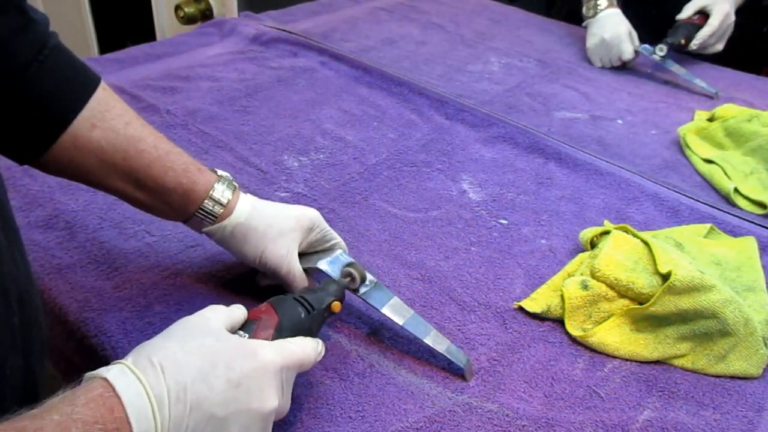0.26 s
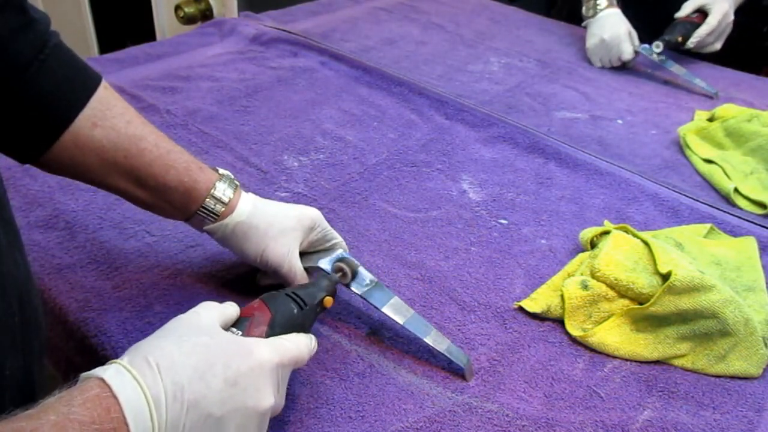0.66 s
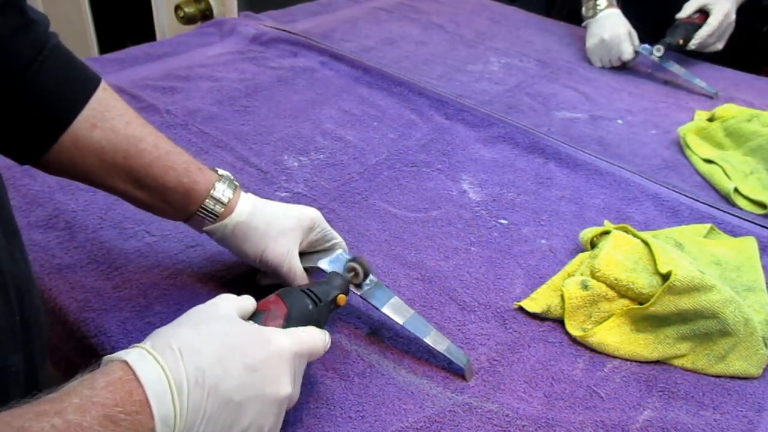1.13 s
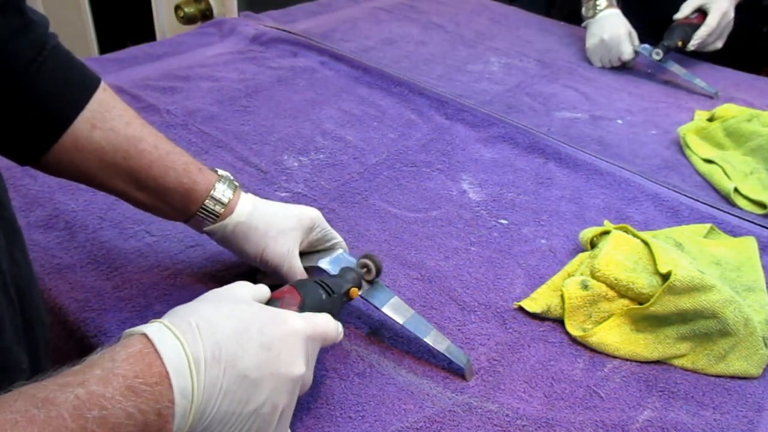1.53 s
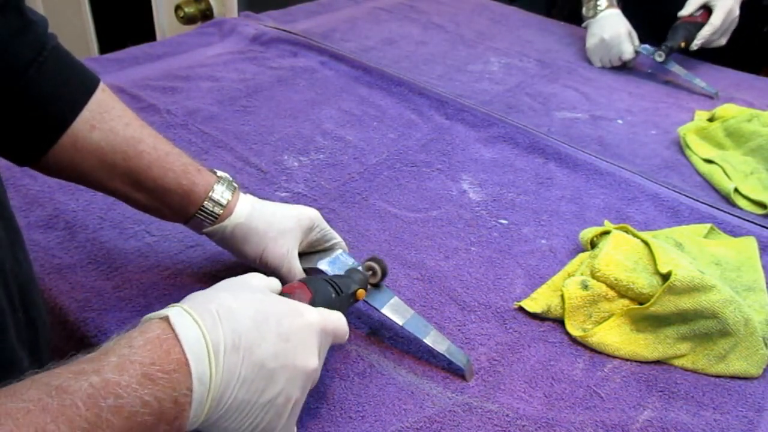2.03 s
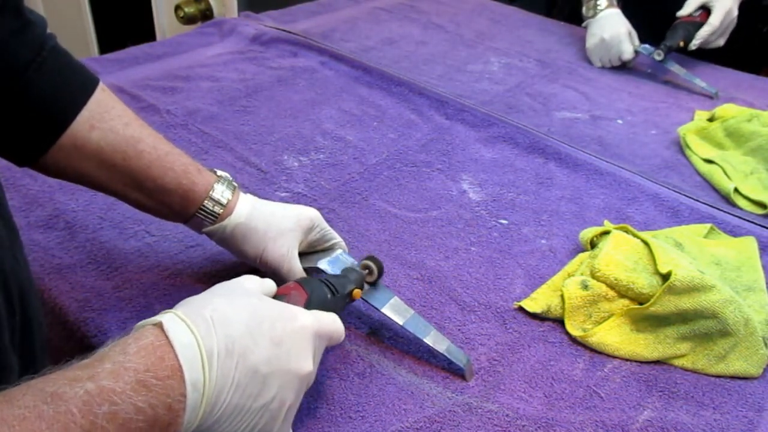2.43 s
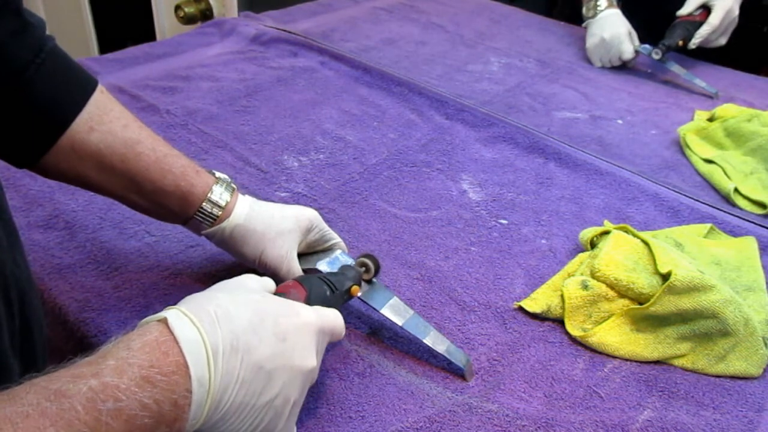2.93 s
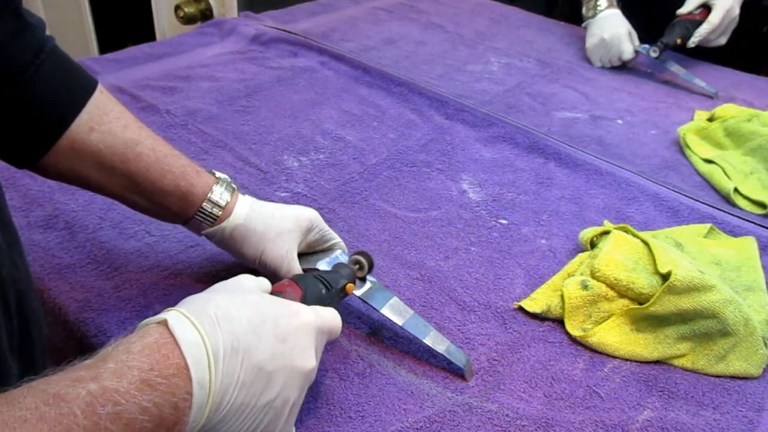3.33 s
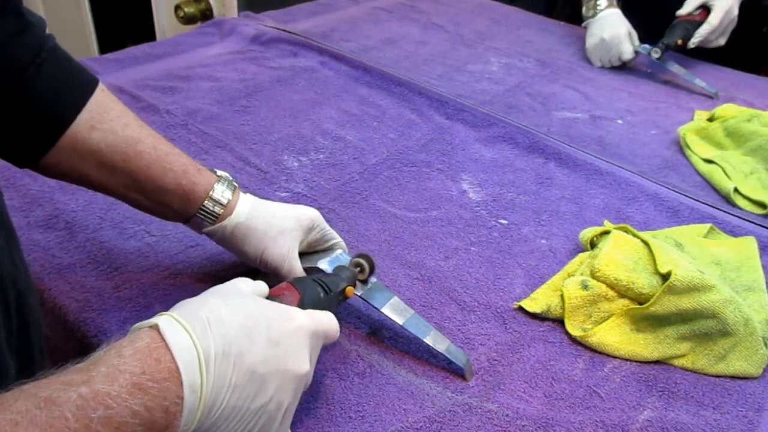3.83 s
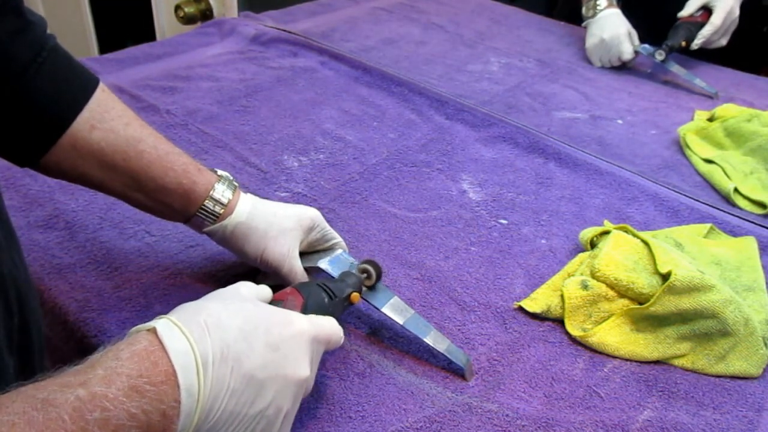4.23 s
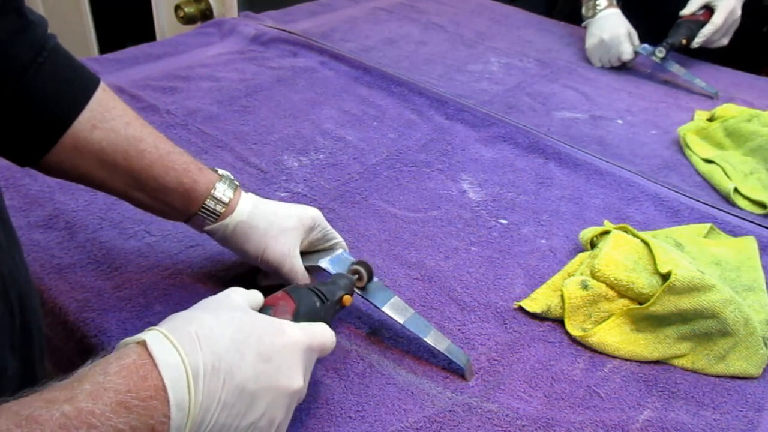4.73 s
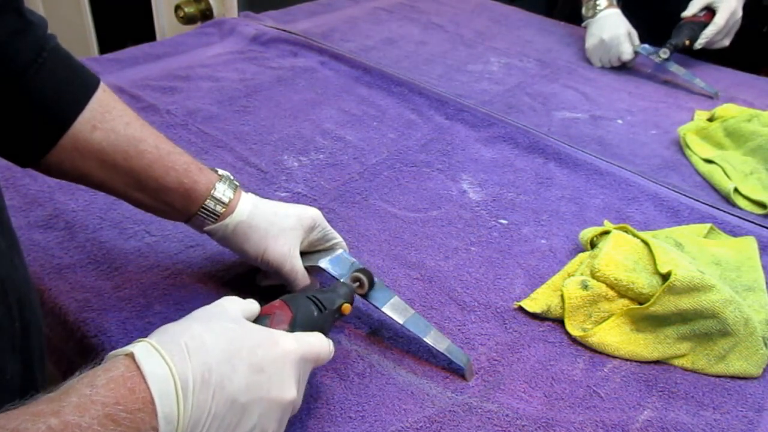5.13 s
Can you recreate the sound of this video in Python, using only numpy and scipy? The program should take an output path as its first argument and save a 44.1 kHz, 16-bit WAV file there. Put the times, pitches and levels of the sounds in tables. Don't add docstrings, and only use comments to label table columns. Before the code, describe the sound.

From the start a small rotary tool is already running, close and centered, with a buzzing, nasal whine made of many stacked tones and a fairly soft buffing hiss. Over the first second the pitch sinks slightly; from about 1 second the whine becomes stronger and the scrape brighter. Repeated strokes, several a second, make the pitch dip and recover. Near 1.7 to 1.9 seconds the wheel skips, with two short dull metallic knocks, a brief wavering of level and soft bench thumps. The motor eases around 2 seconds, then swells by 2.6 with another low thump. From 3 to 5 seconds it is loud and dense, straining more deeply under each stroke, with fleeting high metallic whistles and the lowest pitch after 4.6. Around 5.25 the wheel lifts briefly; pitch rises and some upper tones fade as it ends still running. Faint room rumble and mains hum remain beneath.

```python
import sys
import numpy as np
from scipy import signal
from scipy.fft import rfft, irfft, next_fast_len
from scipy.io import wavfile
from scipy.ndimage import uniform_filter1d

SR = 44100
rng = np.random.default_rng(int(sys.argv[2]) if len(sys.argv) > 2 else 0)


def voltage_ratio(level):
    return 10 ** (np.asarray(level, float) / 20)


def store_wav(level_fs):
    pcm = np.round(np.clip(np.atleast_2d(level_fs), -1, 1) * 32767)
    wavfile.write(sys.argv[1], SR, pcm.T.astype(np.int16))


N = 236623
CONTROL_STEP = 64
RIPPLE_HZ = 120
STROKE_S = 0.07
LEAVE_S, LEAVE_HALF_S, LEAVE_DB = 5.34, 0.065, -11
LIFT_HIGH = 2.1
WHEEL_REF_DB = -24.5

# frequency_hz, density_db
ROOM = [(20, -14), (40, 2), (70, -4), (150, -3), (250, 0.5), (400, -2.5), (700, -30)]
# frequency_hz, level_db
HUM = [(72, -66.5), (120, -61), (240, -63.5)]
# start_s, peak_db, pitch_hz, t60_s
THUMPS = [(.02, -52, 48, .6), (.77, -51, 46.7, 1.4), (1.44, -58, 68, 0.39), (1.71, -44, 55, 0.44),
          (1.87, -43, 51.5, 0.86), (2.13, -41, 49.76, 0.64), (2.66, -38.5, 50, 0.58),
          (3.22, -62, 46.89, 0.49), (3.41, -44, 50, 0.94), (4.05, -47, 48.25, 0.52)]
# start_s, peak_db, pitch_hz, t60_s
SKIPS = [
    (1.715, -30.5, 290, 0.22),
    (1.72, -35, 230, 0.1),
    (1.87, -28.5, 252, 0.1),
    (1.875, -38, 324, 0.12),
]
# frequency_hz, width_hz, level_db
STRIP = [(1887, 87, -33.5), (2880, 260, -34)]
# centre_s, multiple, level_db, half_length_s
GLINTS = [(.05, 36, -55, .08), (.33, 36, -44, 0.12), (.39, 60, -49, .035), (2.2, 60, -49, .15),
          (2.62, 38, -46, .2), (3.27, 62, -39, 0.041), (3.411, 62, -47, .04), (3.506, 38, -36, .06),
          (3.66, 38, -35, 0.091), (4.25, 64, -45, 0.17), (4.55, 64, -56, 0.057), (4.62, 66, -43, .08),
          (4.691, 64, -41, 0.043), (4.68, 40, -37, 0.071), (4.982, 40, -40.5, 0.097), (5.2, 68, -67, 0.048)]
# time_s, level_db
HISS = [(0.0, -32.5), (1.61, -26), (1.93, -25.5), (1.96, -24.5), (2.11, -24), (2.72, -22), (3.23, -24),
        (4.0, -22.5), (5.19, -23), (5.24, -23.5), (5.37, -24)]
# frequency_hz, density_db
WHEEL = [(200, -45), (330, -15.5), (520, -14.5), (700, -5.5), (900, -7), (1400, -4), (2000, -2.5),
         (2900, -4), (3600, -5.5), (4500, -4), (6000, -7.5), (8000, -11), (10300, -14.5), (11500, -30),
         (15000, -44)]
# frequency_hz, density_db
FAN = [(8000, -31), (10500, -3.5), (12000, -4.5), (13500, -8), (15000, -11), (16000, -60)]
# time_s, turns_hz
SPEED = [(0.0, 216.8), (0.38, 211.4), (0.46, 209.3), (0.92, 206.7), (1.06, 202.5), (1.72, 205.9),
         (1.78, 211), (1.87, 208), (1.95, 214), (2.06, 214.1), (2.61, 208), (3.18, 207.1), (3.46, 204.3),
         (4.26, 202.4), (4.66, 192.5), (5.215, 193.5), (5.28, 200.2), (5.37, 206.6)]
# centre_s, loss_hz
STROKES = [(0.29, 0.99), (0.499, 1.91), (0.84, 1.5), (1.04, 1.5), (1.3, 2.3), (1.46, 2.6), (1.61, 2.87),
           (1.74, 2.53), (2.09, 2.98), (2.25, 1.36), (2.52, 1.9), (2.659, 2.12), (2.81, 2.12), (2.97, 2.25),
           (3.14, 3.66), (3.33, 3.73), (3.5, 5.66), (3.671, 4.3), (3.87, 5.5), (4.031, 5.7), (4.179, 5.5),
           (4.34, 6.6), (4.519, 4.84), (4.68, 3.6), (4.85, 5.26), (5.02, 4.65), (5.18, 6.3)]
# time_s, motor_level_db, tilt (0-1), load (0-1)
HOLD = [(0.0, -31, 1, 0.6), (0.3, -28, 0.9, 0.8), (0.53, -26.5, 0.56, 1), (0.73, -28, 0.86, 0.88),
        (1.04, -22, 0.64, 0.85), (1.47, -20.5, 0.63, 0.7), (1.7, -20.5, 0.67, 0.82),
        (1.79, -20.5, 0.35, 0.66), (2.05, -24.5, 0.78, 0.1), (2.45, -20, 0.8, 0.1), (2.59, -17, 0.75, 0.61),
        (2.93, -16.5, 0.73, 0.73), (3.33, -18, 0.58, 0.78), (3.83, -16.5, 0.56, 0.79),
        (4.25, -16.5, 0.48, 0.68), (4.67, -17.5, 0.23, 0.8), (5.07, -18, 0.24, 0.8),
        (5.37, -20, 0.03, 0.58)]
# centre_s, level_db, half_width_s
LIFTS = [
    (1.755, -1.5, 0.023),
    (1.915, -1, 0.027),
    (1.97, 1.6, 0.026),
    (5.245, -2, 0.023),
]

# multiple, level_db (over the motor), tilt_db, load_db, braking_db_per_hz
PULL = [(2.0, -3, -1.8, -13, 0.29), (4.0, -14, 9.5, -3, 0.35), (6.0, -9.5, -0.5, -5.5, 0.0),
        (8.0, -14, 6, 4.5, 0.82)]
CASING = [(10.0, -1.5, -6.5, -10.5, 0.57), (12.0, -19.5, 7, 9.5, -0.0), (14.0, -13, -11.5, 12.5, 0.64),
          (16.0, 1, -5.5, -10.5, 0.69)]
BRUSHES = [(20.0, -13, 0.5, -2, 0.14), (22.0, -19, -1.5, 4.5, 0.35), (24.0, -19, 8, -3.5, 0.68),
           (30.0, -7, -9.5, -6, 0.025)]
BLADES = [(32.0, -20, -5, 7.5, -0.25), (48.0, -19.5, -11.5, 3.5, 0.13), (62.0, -38, 2.1, -1, 0.4),
          (64.0, -32, -12.6, 4.1, 0.3)]
IMBALANCE = [(1.0, -54, 15.8, 17.5, 0.23), (3.0, -36, 13.4, 9.5, 0.21), (9.0, -36.5, 35, -5, -0.2)]
# ripple_steps, level_db, tilt_db, load_db, braking_db_per_hz
SIDE_TONES = [(-2.0, -7.5, -5.5, -11, 0.5), (-1.0, -15.5, -20, 11.5, -0.8), (1.0, -22.5, -10, 7.5, 0.5)]
# multiple, early_db, middle_db, late_db
MINOR = [(7.01, -43.5, -37.5, -38.5), (11, -43, -62, -60), (13.02, -44, -31, -45), (14.95, -59, -50, -50),
         (17.07, -57, -38, -43), (17.92, -47, -39, -34), (25.93, -55, -35.5, -48),
         (27.97, -44.5, -35.5, -45), (34.2, -48.5, -37.5, -36), (35.9, -55, -41.5, -47),
         (38, -64, -52, -60), (40, -53, -61, -55), (44, -57, -50, -53), (46, -50, -54, -44),
         (50, -60, -71, -59), (52, -57, -66, -56), (56, -63, -57, -55), (60, -62, -58, -58),
         (66, -66, -58, -60)]
# multiple, ripple_steps, early_db, middle_db, late_db
FAINT_SIDES = [(2, 1, -70, -67, -55), (4, -1, -58, -87, -79), (12, 1, -52, -56, -39),
               (14, 1, -75, -33, -42)]
STAGES = [.85, 2.75, 4.5]

# centre_s, multiple, level_db, half_width_s
SHIFTS = [(0.0, 3, -18, 0.4), (0.13, 8, -3.5, 0.27), (0.15, 14, 3.5, 0.16), (0.65, 2, -12.3, 0.11),
          (0.86, 14, -7.5, 0.13), (0.86, 32, 5.5, 0.15), (1.01, 22, -33, 0.12), (1.08, 8, 1.5, 0.51),
          (1.17, 20, -13, 0.18), (1.28, 2, 2, 0.4), (1.33, 6, -12, 0.37), (1.5, 24, 2.5, 0.25),
          (1.56, 30, -14, 0.34), (1.72, 9, -8, 0.27), (1.759, 12, 3, 0.17), (1.83, 22, -16.4, 0.057),
          (1.92, 3, -23.5, 0.1), (0.105, 9, -8, .022), (.15, 9, 6, 0.012), (.185, 9, 3, 0.014),
          (.218, 9, 5, 0.014), (.297, 9, 5, .012), (.262, 9, -7, .022), (2.21, 9, -3, 0.042),
          (2.53, 22, -3, 0.12), (2.83, 20, 2, 0.23), (3.65, 22, 6.5, 0.2), (3.77, 10, -7, 0.4),
          (3.97, 12, -3.5, 0.31), (4.37, 2, -4.5, 0.41), (4.48, 8, -3.5, 0.42), (4.55, 10, 3.5, 0.22),
          (4.6, 9, 12, 0.4),
          (0.0, 22, -21, 0.051), (.07, 24, -22, 0.18), (.26, 2, -22, 0.03), (.32, 4, -6, 0.1),
         (1.46, 48, -4, 0.31), (1.56, 1, -9.5, 0.044), (1.68, 8, -8, 0.03), (2.26, 20, -5, 0.097),
         (2.48, 4, -6, 0.099), (2.5, 2, -7, 0.071), (2.73, 24, -4, 0.27), (2.83, 1, 5, 0.087),
         (2.9, 62, 9, 0.36), (3.1, 1, -31, 0.026), (3.15, 32, -3, 0.46), (2.15, 4, -3.5, 0.044),
         (3.22, 24, -3, 0.13), (3.96, 4, -2, 0.56), (4.04, 62, -9, .3), (4.38, 22, 3, .2),
         (4.51, 30, 2.5, 0.22), (4.88, 22, -15, 0.16), (4.9, 14, -15, 0.061), (4.91, 8, -12, 0.11),
         (5.131, 20, -12, 0.46), (5.13, 16, 4.5, 0.078), (5.31, 4, -7, 0.059)]
SWINGS = [(.2, 36, 2, .25), (.2, 34, -8, .4), (0.519, 8, 3.5, 0.084), (.8, 8, 4.5, 0.075),
          (1.2, 16, -2, 0.16), (1.3, 24, 1, .1), (1.7, 22, 5, 0.034), (1.45, 26, 9, .3), (1.58, 20, 0, .1),
          (1.62, 12, 2.5, 0.11), (.35, 9, 5, 0.025), (1.97, 4, 4.5, 0.045), (.04, 12, 5, .05),
          (1.98, 9, 7, .03), (1.99, 8, -7, 0.035), (2.45, 32, 5, 0.21), (2.55, 8, 3, 0.063),
          (2.95, 4, -1, 0.18), (4.35, 8, -7, 0.067), (5.25, 12, -4, 0.087), (3.45, 10, -4, .12),
          (4.95, 6, 3.5, 0.18), (5.3, 1, -19, 0.074), (.12, 13, -2, 0.13), (1.75, 4, -8, 0.02),
          (1.85, 12, 6, .04), (1.9, 4, -6, .03), (1.91, 12, -2, .025), (1.91, 16, 0, 0.028),
          (1.93, 8, 6.5, 0.037), (1.96, 16, 3, .025), (2.0, 1, -12, 0.22), (2.35, 48, 1, .2),
          (2.43, 9, 3, .04), (3.5, 6, 2.5, 0.13), (4.12, 8, 1.5, .12), (5.2, 1, 3, 0.093)]
EARLY_SWINGS = [(0.05, 14, 10, 0.038), (0.14, 13, 6, 0.23), (0.17, 12, -10, 0.037), (0.24, 8, 0, 0.035),
                (0.28, 10, -15, 0.07), (0.33, 11, 2, 0.22), (0.39, 8, -4.5, 0.086), (0.43, 9, -12, 0.028),
                (0.51, 14, -13, 0.042), (0.53, 20, -5, 0.36), (0.54, 13, -11, 0.035), (0.6, 26, 11, 0.26),
                (0.7, 8, -9, 0.044), (0.72, 10, 5, 0.077), (0.87, 6, -9, 0.11), (0.93, 24, -12, 0.26),
                (0.98, 18, 6, 0.24), (1.0, 22, 7.5, 0.28), (1.03, 12, -21, 0.027), (1.03, 26, 7, 0.098),
                (1.25, 12, -9, 0.035), (1.35, 48, -10.0, 0.035), (1.37, 8, 5, 0.035), (1.92, 16, -4, 0.02),
                (1.51, 16, -12.5, 0.042), (1.93, 48, -1, 0.093), (2.1, 60, 10, 0.057), (1.83, 62, 8, .05),
                (2.28, 60, 6, .05), (1.57, 12, 4.5, 0.027), (1.58, 20, 7.5, 0.027), (1.71, 16, -8, 0.044),
                (1.72, 10, 5, 0.19), (1.78, 12, -2, 0.029), (1.8, 14, -12, 0.041), (1.81, 26, 3, 0.19),
                (1.87, 28, -15, 0.32), (1.922, 24, -9.5, 0.042), (1.96, 7, -8, 0.035), (2.05, 8, -1, 0.033),
                (2.05, 13, -7.0, 0.092), (2.06, 22, 11.5, 0.05), (2.16, 8, 6, 0.039), (2.21, 9, 6, 0.032),
                (2.23, 8, -3, 0.03), (2.27, 7, -7.0, 0.12), (2.27, 48, 5, 0.12), (2.3, 3, -16, 0.055),
                (2.31, 8, 4, 0.031), (2.35, 14, -13, 0.28), (2.42, 18, -5, 0.13)]
LATE_SWINGS = [(5.25, 2, -10, 0.018), (5.25, 4, -6, .025), (5.19, 10, -3, 0.026), (5.21, 14, -5, 0.024),
               (5.33, 16, 0, 0.039), (3.1, 62, -3, .05), (3.41, 62, -3, .1), (2.81, 8, -7, 0.025),
               (2.83, 34, -9, 0.17), (2.95, 10, 2, 0.28), (3.02, 28, 4, 0.26), (3.08, 3, -17, 0.033),
               (3.1, 6, 7, 0.034), (3.13, 9, -2, 0.035), (3.16, 20, -10, 0.035), (3.28, 11, 10, 0.26),
               (3.29, 62, 7, 0.05), (3.32, 8, -3.5, 0.035), (3.34, 48, -9.5, 0.11), (3.36, 4, 5.5, 0.025),
               (3.36, 18, 8, 0.11), (3.39, 10, 9, 0.034), (3.47, 8, 3.5, 0.019), (3.471, 12, -5, 0.043),
               (3.63, 4, -7, 0.027), (3.65, 28, -17, 0.31), (3.69, 30, -4.0, 0.3), (3.73, 9, -8, 0.036),
               (3.74, 10, 11, 0.033), (3.74, 26, 14, 0.036), (3.97, 6, 3.5, 0.035), (4.01, 8, -8, 0.032),
               (4.12, 18, 8, 0.058), (4.23, 10, -4, 0.034), (4.25, 8, 6.5, 0.027), (4.27, 16, 4, 0.032),
               (4.3, 14, 3, 0.035), (4.31, 8, -9, 0.031), (4.36, 16, -15, 0.039), (4.38, 48, 3, 0.035),
               (4.39, 8, 6, 0.035), (4.48, 32, -4.5, 0.17), (4.53, 9, -7, 0.05), (4.53, 16, -11, 0.043),
               (4.76, 18, 3, 0.062), (4.83, 28, 0, 0.26), (4.83, 30, -13, 0.035), (4.86, 2, -3, 0.13),
               (4.89, 34, -6.0, 0.26), (4.9, 10, -7, 0.18), (4.92, 7, -8.5, 0.26), (5.13, 28, 14, 0.05)]
# centre_s, ripple_steps, level_db, half_width_s
SIDE_SHIFTS = [(1.02, -1, -17, 0.25), (1.87, -1, -17, .13), (2.83, -1, -6.5, .3), (4.21, -1, 2, .26),
               (4.6, -1, 2, .15), (5.0, -1, 3, 0.22), (5.31, -1, -1, .035), (5.36, -1, -10, 0.048)]


def unit(x):
    return x / np.sqrt(np.mean(x ** 2) + 1e-20)


def curves(rows):
    s, *cols = np.transpose(rows)
    return [np.interp(np.arange(N) / SR, s, c) for c in cols]


def staged(db):
    return np.interp(np.arange(N) / SR, STAGES, db)


def bump(s, half):
    return np.exp(-((np.arange(N) / SR - s) / half) ** 2)


def wobble(rate):
    return np.interp(np.arange(N) * rate / SR, np.arange(400), rng.standard_normal(400))


def noise(spectrum):
    m = next_fast_len(N)
    hz, db = np.transpose(spectrum)
    log_hz = np.log(np.fft.rfftfreq(m, 1 / SR) + 1)
    gain = voltage_ratio(np.interp(log_hz, np.log(hz + 1), db))
    return unit(irfft(rfft(rng.standard_normal(m)) * gain, m)[:N])


def tone(turns, db, flutter_db, blur):
    phase = 2 * np.pi * turns + 1.71 * wobble(1.318) + blur * wobble(60)
    flutter = flutter_db * (0.55 * wobble(35) + 0.15 * wobble(11))
    return np.sqrt(2) * voltage_ratio(db + flutter) * np.cos(phase)


def workshop(gain_db):
    t = np.arange(N) / SR
    hum = sum(tone(hz * t, db, flutter_db=2.5, blur=0.4) for hz, db in HUM)
    rumble = voltage_ratio(-55.0 + 3.0 * wobble(3.15)) * noise(ROOM)
    return voltage_ratio(gain_db) * (hum + rumble)


def bench():
    out, t = np.zeros(N + SR), np.arange(SR) / SR
    for rows, rise_s, rough in ((THUMPS, 0.03, 0.3), (SKIPS, 0.008, 3.5)):
        for s, db, hz, t60 in rows:
            drift = rough * np.cumsum(rng.standard_normal(SR)) / 45
            ring = np.sin(2 * np.pi * hz * t + drift) * (1 - np.exp(-t / rise_s))
            out[round(s * SR):][:SR] += voltage_ratio(db - 60 * t / t60) * ring
    return out[:N]


def strip(turns, wheel_db):
    out = np.zeros(N)
    for hz, width_hz, db in STRIP:
        ring = signal.lfilter(*signal.iirpeak(hz, hz / width_hz, SR), rng.standard_normal(N))
        level_db = 1.5 * (wheel_db - WHEEL_REF_DB) + db + 0.98 * wobble(6.0)
        out += voltage_ratio(level_db) * unit(ring)
    for s, k, db, half in GLINTS:
        out += bump(s, half) * tone(round(k) * turns, db, flutter_db=5, blur=0.67)
    return out


def hiss(turns, wheel_db):
    twice = 0.068 * np.cos(2 * 2 * np.pi * turns + 0.76 * wobble(40))
    once = 0.061 * np.cos(2 * np.pi * turns)
    rub = 1 + twice + once
    grip_db = 0.42 * wobble(18) + 1.04 * wobble(70)
    wheel = voltage_ratio(wheel_db + 1.5 + grip_db) * unit(rub * noise(WHEEL))
    fan_db = 0.93 * (wheel_db - WHEEL_REF_DB) - 43 + 0.46 * grip_db
    fan_db += 0.91 * wobble(4.8) + 0.6 * wobble(25)
    return wheel + voltage_ratio(fan_db) * unit(rub * noise(FAN))


def pressing(speed):
    usual = uniform_filter1d(speed, SR // 4, mode="nearest")
    dip = usual - uniform_filter1d(speed, SR // 30, mode="nearest")
    return np.clip(dip + 0.14 * SR * np.gradient(dip), -2.5, 2.5)


def level_shift(multiple, shifts):
    n = np.arange(0, N, CONTROL_STEP)
    slow = np.zeros(len(n))
    for s, k, db, half in shifts:
        if round(k) == round(multiple):
            slow += db * np.exp(-((n / SR - s) / half) ** 2)
    return np.interp(np.arange(N), n, slow)


def loudness(row, press, shifts):
    multiple, db, tilt_db, load_db, braking_db = row
    level_db, tilt, load = curves(HOLD)
    held_db = level_db + db + tilt_db * tilt + load_db * load
    return held_db + braking_db * press + level_shift(multiple, shifts)


def family(turns, rows, press, flutter_db, blur):
    shifts = SHIFTS + SWINGS + EARLY_SWINGS + LATE_SWINGS
    return sum(tone(round(row[0]) * turns, loudness(row, press, shifts), flutter_db, blur) for row in rows)


def minor_tones(turns, swell_db):
    out = np.zeros(N)
    for k, *db in MINOR:
        level_db = staged(db) + level_shift(k, SWINGS + EARLY_SWINGS + LATE_SWINGS) + swell_db + 0.6 * wobble(4)
        out += tone(round(k) * turns, level_db, flutter_db=2.5, blur=0.36)
    return out


def motor(turns, swell_db, press, lift_db):
    ripple = RIPPLE_HZ * np.arange(N) / SR
    low = family(turns, PULL, press, flutter_db=3.0, blur=0.21)
    low += family(turns, IMBALANCE, press, flutter_db=1.5, blur=0.25)
    high = family(turns, CASING, press, flutter_db=2.0, blur=0.22)
    leave = voltage_ratio(LEAVE_DB * bump(LEAVE_S, LEAVE_HALF_S))
    high += leave * family(turns, BRUSHES, press, flutter_db=2.5, blur=0.3)
    high += family(turns, BLADES[:1], press, flutter_db=3, blur=0.5)
    high += np.sqrt(leave) * family(turns, BLADES[1:], press, flutter_db=3.6, blur=0.45)
    high += minor_tones(turns, swell_db)
    high *= 1 + 0.03 * np.sin(2 * np.pi * ripple)
    slot = 16 * turns
    for row in SIDE_TONES:
        level_db = loudness(row, press, SIDE_SHIFTS)
        high += tone(slot + round(row[0]) * ripple, level_db, flutter_db=1.6, blur=0.16)
    for k, step, *db in FAINT_SIDES:
        low += tone(round(k) * turns + round(step) * ripple, staged(db), flutter_db=0.82, blur=0.62)
    return voltage_ratio(lift_db) * low + voltage_ratio(LIFT_HIGH * lift_db) * high


def scene():
    speed = curves(SPEED)[0] - sum(loss_hz * bump(s, STROKE_S) for s, loss_hz in STROKES)
    turns = np.cumsum(speed + 0.247 * wobble(30)) / SR
    wheel_db = curves(HISS)[0]
    slow_db = uniform_filter1d(wheel_db, SR, mode="nearest")
    lift_db = sum(db * (1 - (1 - bump(s, half)) ** 2) for s, db, half in LIFTS)
    room = workshop(1.25 * (slow_db - slow_db.mean()))
    tool = hiss(turns, wheel_db + 0.72 * lift_db)
    tool += motor(turns, wheel_db - slow_db, pressing(speed), lift_db)
    mono = room + bench() + strip(turns, wheel_db) + tool
    return np.array([mono, mono])


def roll_off(x):
    return signal.sosfilt(signal.butter(12, 15000, fs=SR, output="sos"), x)


def record(dry):
    mix = dry / (1 + abs(dry / 0.9) ** 4) ** 0.25
    return roll_off(mix)


dry = scene()
out = record(dry)
store_wav(out)
```